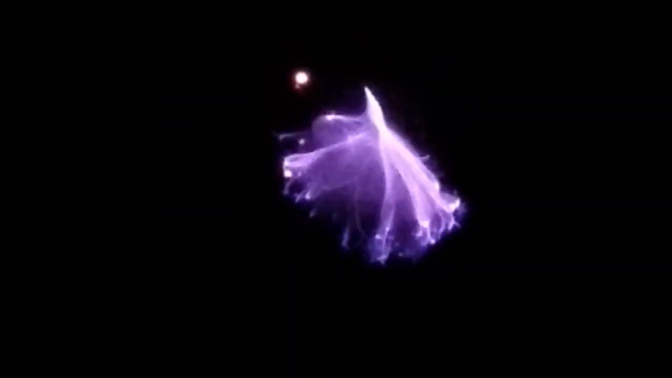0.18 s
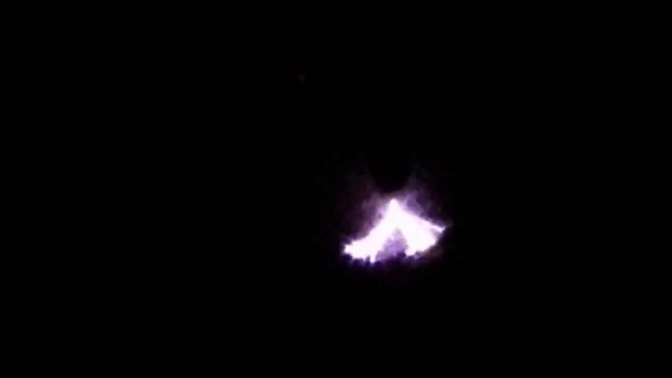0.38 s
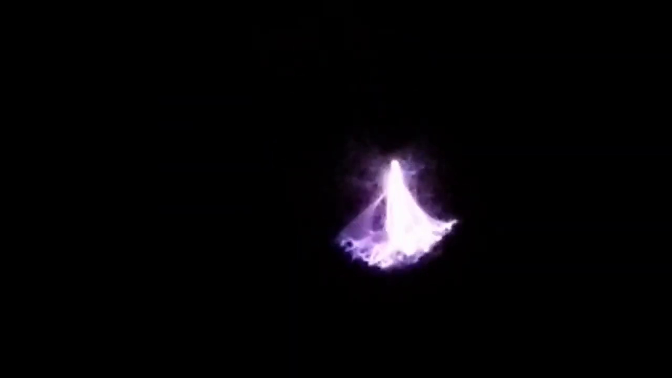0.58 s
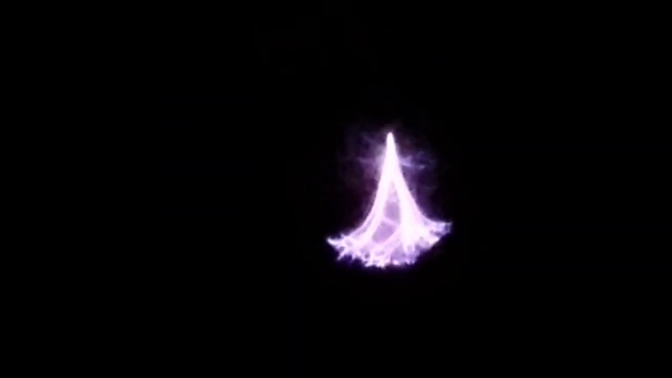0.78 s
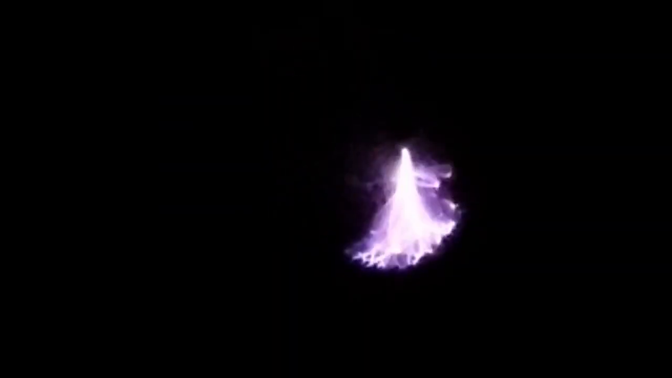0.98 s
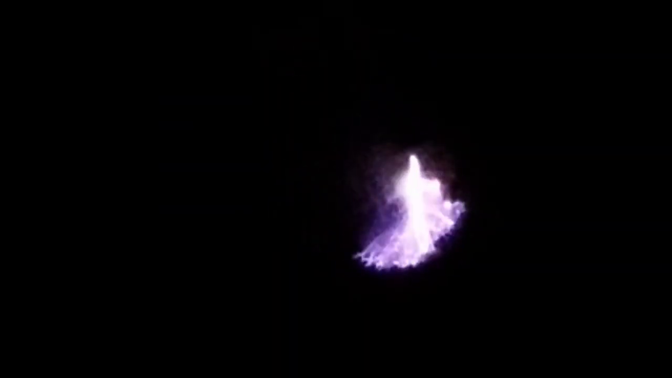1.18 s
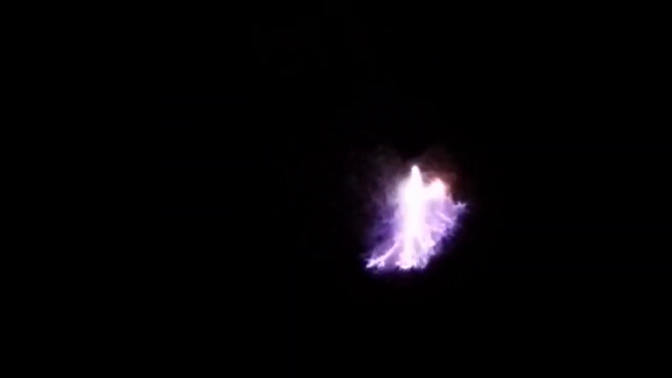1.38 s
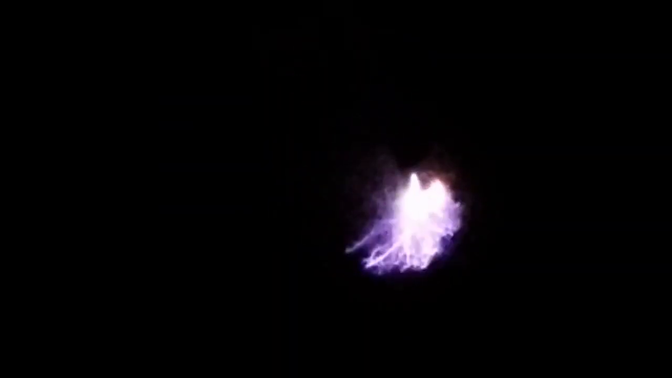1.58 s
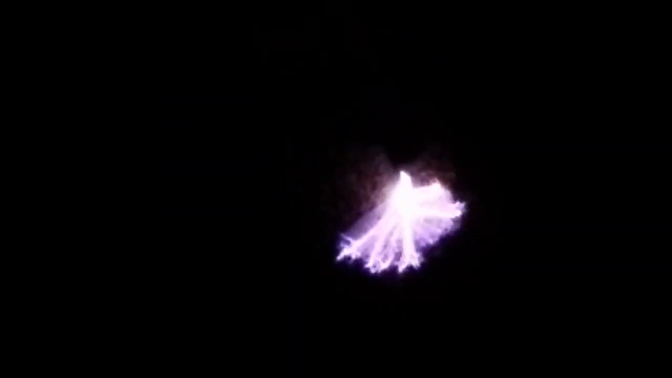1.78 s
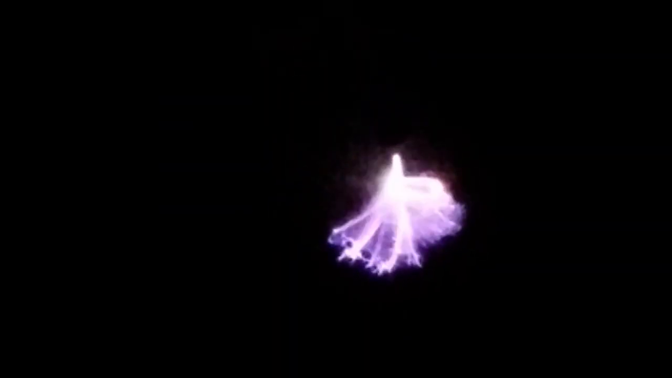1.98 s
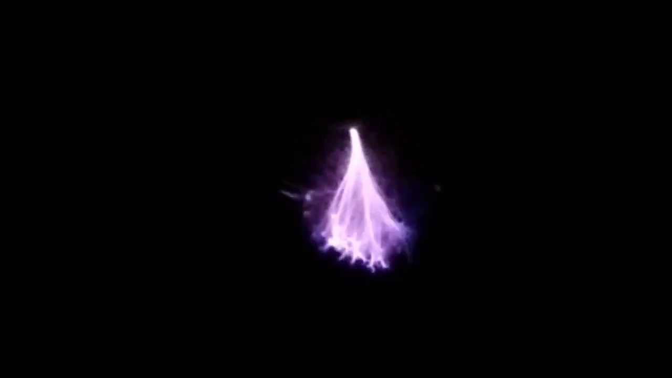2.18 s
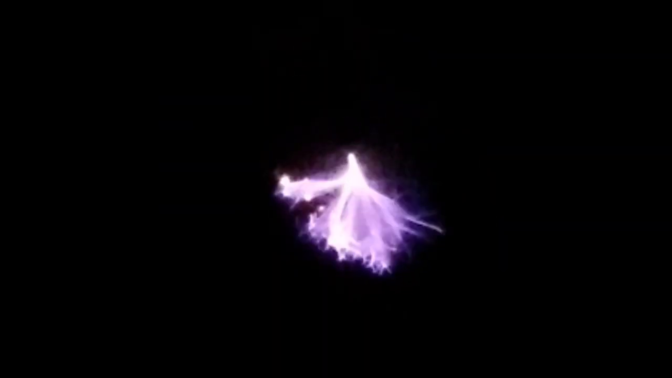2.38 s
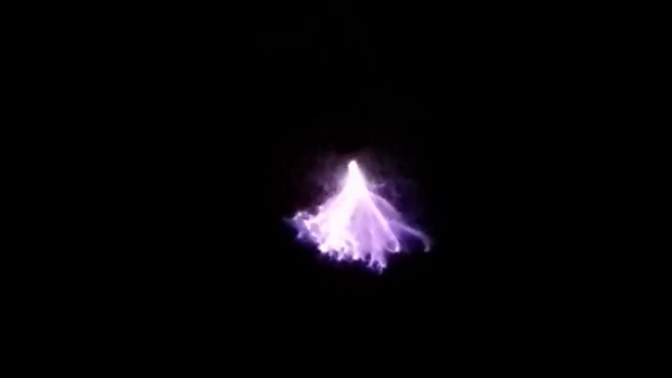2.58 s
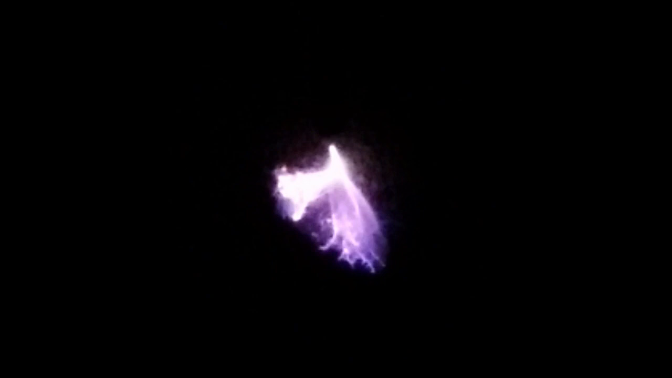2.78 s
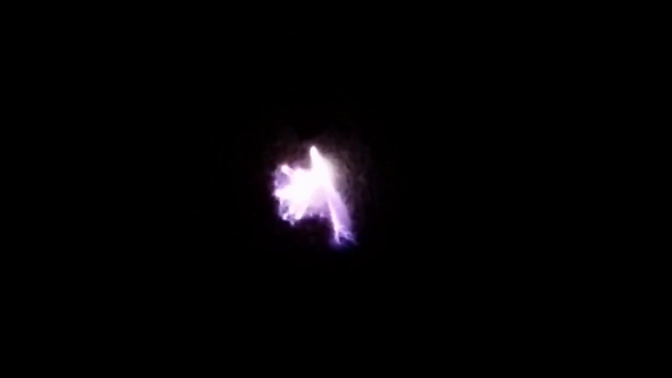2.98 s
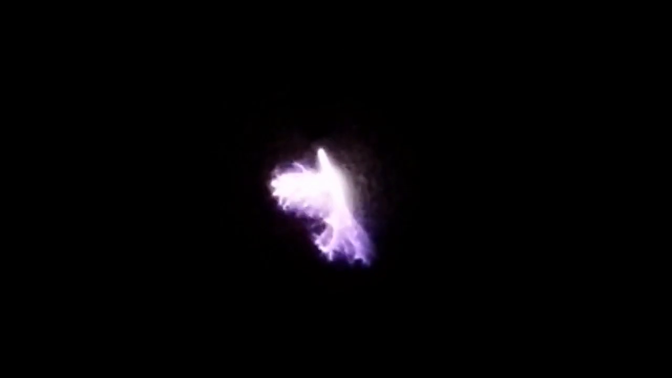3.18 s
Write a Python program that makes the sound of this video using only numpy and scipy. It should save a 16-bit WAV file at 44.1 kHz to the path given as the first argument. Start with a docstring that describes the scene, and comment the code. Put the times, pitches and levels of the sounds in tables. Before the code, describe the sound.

High-voltage electric arc buzzes harshly at mains rate, sizzling and crackling over a low hum.

```python
"""A faint buzz over a low rumble comes first, then swells: a mains-fed high-voltage arc over powder on a bench.
It strikes on every half cycle with a sharp snap, an impulse through a resonant colour; streamers fan out
as a short sizzling burst of gated noise, with tables for its delay and level (a long gap: later, louder).
Stray sparks crackle as random impulses, a few loud pops stand out, and a transformer hums as a wavering sine.
Two close microphone ports, near surfaces, a bench echo and a small room colour the arc."""
import sys
import numpy as np
from scipy import signal
from scipy.fft import rfft, irfft, next_fast_len
from scipy.io import wavfile
from scipy.ndimage import uniform_filter1d, map_coordinates

SR = 44100
rng = np.random.default_rng(int(sys.argv[2]) if len(sys.argv) > 2 else 0)


def store_pcm(level_fs):
    """Save levels as 16-bit WAV."""
    pcm = np.round(np.clip(level_fs, -1, 1) * 32767).astype(np.int16)
    wavfile.write(sys.argv[1], SR, np.atleast_2d(pcm).T)


def volts_from_decibels(level):
    """Turn decibel levels (scalar or array-like) into linear amplitude factors."""
    exponent = np.asarray(level, float) / 20
    return 10 ** exponent


N = 145530  # samples, 3.3 s
HALF_CYCLE_HZ = 120


def unit(x):
    """Normalisation: scale a signal to rms 1."""
    return x / np.sqrt(np.mean(x ** 2) + 1e-20)


def along(points, hz, col=1):
    """Spectral envelope: a table column interpolated on a log-frequency axis."""
    p = np.array(sorted(points))
    return np.interp(np.log(hz + 1), np.log(p[:, 0] + 1), p[:, col])


def at(rows, place):
    """Piecewise-linear envelope: every column after the first, read at the given places."""
    knots, *cols = np.transpose(rows)
    return [np.interp(place, knots, c) for c in cols]


def wobble(rate):
    """Band-limited random modulation: a smooth curve through random knots, rate of them a second."""
    return map_coordinates(rng.standard_normal(int(N * rate / SR) + 4), [np.arange(N) * rate / SR])


def filtered(x, response):
    """Linear filtering: convolution as a product with a complex frequency response."""
    size = next_fast_len(N + SR // 2)
    hz = np.fft.rfftfreq(size, 1 / SR)
    return irfft(rfft(x, size) * response(hz), size)[..., :N]


def causal(db):
    """Minimum phase: folding the cepstrum gives the causal response of a gain in dB on an FFT grid."""
    cepstrum = irfft(np.log(volts_from_decibels(db)))
    half = len(cepstrum) // 2
    cepstrum[1:half] *= 2
    cepstrum[half + 1:] = 0
    return np.exp(rfft(cepstrum))


def pulses(times, size):
    """Band-limited impulses: windowed sinc pulses at fractional sample times [s]."""
    place = np.asarray(times)[:, None] * SR
    i = place.astype(int) + np.arange(-7, 9)
    weight = np.sinc(i - place) * np.cos(np.pi * (i - place) / 16) ** 2 * size[:, None]
    return np.bincount(np.clip(i, 0, N).ravel(), weight.ravel(), N + 1)[:N]


def heard(x, colour_db):
    """Two-receiver transfer: source colour, port resonances, reflections and an interchannel phase lead."""
    # bench and housing colour at each port: (frequency [Hz], left [dB], right [dB])
    port_colour = [(292, -23.5, -21.5), (606, -20.5, -19), (980, -19.5, -12.5), (1337, -14, -18.5),
                   (1620, -15, -19), (2200, -25.5, -33), (2297, -14, -19), (2690, -16, -12.5),
                   (2995, -15, -18), (3444, -7.5, -26), (3610, -17.5, -15), (4103, -5, -7.5),
                   (4203, 0, -2.5), (4680, -4.5, -19.5), (4900, 4.4, -7), (4963, -4.5, -5),
                   (5320, -6.5, -25), (5560, -11.5, -3.5), (6620, -11, -18.5), (7030, -9, -8.5),
                   (8060, -19, -15.5), (8100, -26.5, -13), (9160, -10, -18.5), (9600, -15, -31.5),
                   (10530, -22, -12), (11200, -16.5, -20.5), (11600, -16, -21.5), (12200, -21.5, -25.5),
                   (13500, -20.5, -24), (15500, -26, -23)]
    # reflections from near surfaces: (delay [ms], left [dB], right [dB])
    near_surfaces = [(1.4, -18, -16), (3.6, -20, -18), (4.6, -16, -16)]
    # phase of the left port ahead of the right: (frequency [Hz], lead [rad])
    port_lead = [(0, 0), (690, 0.6), (1720, 2.0), (2410, 1.0), (2840, 2.8), (3270, 2.8), (3530, 0.5),
                 (4310, 3.0), (5340, 1.9), (5680, 2.8), (5940, 1.2), (6290, 4.6), (6720, 6.5), (7060, 3.7),
                 (7410, 5.4), (7750, 1.9), (8180, 7.4), (8440, 3.8), (8870, 4.7), (9130, 6.3), (9470, 6.2),
                 (9990, 9.1), (10800, 11.6), (11600, 12.0), (13100, 11.6), (15800, 15.8)]
    alike_below_hz = 560

    def way(hz):
        apart = 1 / (1 + (alike_below_hz / (hz + 1)) ** 4)  # the ports agree in the bass
        left = along(port_colour, hz, col=1)
        right = along(port_colour, hz, col=2)
        shared = causal((left + right) / 2 + colour_db(hz))
        lead = at(port_lead, hz)[0]
        out = []
        for col, side in ((1, .5), (2, -.5)):
            reflections = sum(volts_from_decibels(w[col]) * np.exp(-2j * np.pi * hz * w[0] / 1000) for w in near_surfaces)
            own = volts_from_decibels(side * apart * (left - right)) * np.exp(1j * side * lead)
            out.append(shared * (1 + apart * reflections) * own)
        return np.array(out)
    return filtered(x, way)


def streamers(t, cycle):
    """Gated noise: per half cycle a clean leader click and a burst of grit sharing its set energy."""
    # burst within the half cycle: (time [s], delay [ms], length [ms], clean click's energy share [0-1])
    burst_timing = [(0, 3.75, .5, .7), (.27, 3.75, .5, .7), (.31, 4.1, 1.5, .1), (.43, 4.1, 1.5, .1),
                    (.46, 3.15, .5, .7), (.66, 3.15, .6, .5), (.9, 3.2, 1.1, .2), (.95, 4.1, 1.3, .1),
                    (1.1, 4.1, 1.3, .1), (1.13, 3.1, .6, .6), (1.5, 3.1, .5, .9), (2.2, 3.1, .5, .9),
                    (2.28, 3.1, 1.1, .3), (2.32, 4.1, 1.6, .1), (2.51, 4.1, 1.6, .1), (2.56, 3.15, .6, .5),
                    (3.3, 3.15, .5, .7)]
    # single bursts that stand out: (time [s], boost [dB])
    strong_bursts = [(.187, 5), (.312, 1), (.719, 8), (1.136, 8), (1.452, 3), (2.278, 2), (1.33, 3),
                     (2.52, 5)]
    scatter_db, jitter_ms, leader_jitter_ms = 1.1, .12, .02
    odd_half_db = .7  # one polarity burns stronger
    corona_db, treble_corona_db = -12, 0  # steady hiss under the bursts, before band levels
    treble_spread, treble_leader = .7, .1

    count = np.arange(cycle[-1] + 1)
    start = count / HALF_CYCLE_HZ
    r = rng.standard_normal((len(start), 3))
    delay_ms, length_ms, clean = at(burst_timing, start)
    strong_db = sum(db * (count == int(s * HALF_CYCLE_HZ)) for s, db in strong_bursts)
    size = volts_from_decibels(scatter_db * r[:, 1] + strong_db + odd_half_db * (-1.) ** count)

    since_ms = (t - start[cycle]) * 1000 - (delay_ms + jitter_ms * r[:, 0])[cycle]
    progress = np.clip(since_ms / length_ms[cycle], 0, 1)
    grit = np.sqrt(np.abs(np.sin(np.pi * progress))) * rng.standard_normal((3, N))
    energy = np.bincount(cycle, grit[0] ** 2) + 1e-9
    grit = grit / np.sqrt(energy)[cycle] * (size * np.sqrt(1 - clean))[cycle]
    leader_time = start + (delay_ms + .1 + leader_jitter_ms * r[:, 2]) / 1000
    leader = pulses(leader_time, -size * np.sqrt(clean))

    source = unit(leader + grit[0]) + volts_from_decibels(corona_db) * rng.standard_normal((2, N))
    wide = unit(treble_leader * leader + grit[0]) + treble_spread * unit(grit[1:])
    wide = wide + volts_from_decibels(treble_corona_db) * rng.standard_normal((2, N))
    return source, wide, size


def sizzle():
    """Subband synthesis: four bands of the streamer bursts follow their own level envelopes."""
    # burst levels before the common gain:
    # (time [s], level [dB], treble re level [dB], low mids re level [dB], mids re level [dB])
    band_levels = [(0, -39, -7, -6.5, -2), (.08, -47, 2, -14, 1), (.1, -54, -5, -4, 1),
                   (.17, -48, -7, -7, -2), (.19, -47, -3, -11, -4), (.22, -47.5, -11, -8, 3),
                   (.23, -40, -0.5, -11, 3), (.265, -34, -4, -17, -9), (.279, -34.5, 0, 0, 1.5),
                   (.305, -51, 15.5, -7, 3), (.312, -24.5, -4, -18, -7), (.435, -30, 0, -7.5, -5),
                   (.445, -38.5, -2, -5.5, -11), (.56, -37, 2, -6, -15), (.66, -32, -4, -11.5, -14),
                   (.67, -29.5, -0.5, -16, -7), (.73, -30, -7.5, -20, -14), (.75, -32, -1.5, -16, -11),
                   (.8, -32.5, 0, -13, -6.5), (.89, -29.5, -0.5, -27, -2), (.91, -26.5, -0.5, -11, -5.5),
                   (1.0, -27.5, -1, -12, -10), (1.1, -31, 2.5, -5, -3), (1.11, -36.5, 0.5, -16, 7),
                   (1.14, -31.5, -6.5, -30, -11), (1.15, -44.5, 10, -30, 10),
                   (1.21, -35.5, -2.5, -11, -4.5), (1.26, -34, -1.5, -13, 0.5), (1.345, -27, -12, -15, -17),
                   (1.36, -33.5, -5.5, -8, -14), (1.43, -35.5, -4, -14, -12), (1.455, -29, -12, -15.5, -34),
                   (1.48, -34, -5, -10, -6), (1.51, -35.5, -5.5, -12, -12), (1.55, -33, -6.5, -8, -12.5),
                   (1.81, -33.5, -4, -8.5, -12), (2.0, -32.5, -4, -10.5, -11), (2.2, -32.5, -5, -9.5, -7.5),
                   (2.22, -35, 2.5, -10, 0.5), (2.25, -28.5, -3, -30, -1), (2.27, -28.5, -4.5, -14, -8),
                   (2.29, -35, 0, -13, -1), (2.31, -27.5, -1, -12.5, -12), (2.4, -26, -2, -15, -12),
                   (2.505, -30, 0, -9, -4.5), (2.53, -29, -11.5, -20, -16), (2.56, -32, -4.5, -21, -11),
                   (2.65, -28.5, -6, -23, -19), (2.74, -29.5, -5.5, -23, -24),
                   (2.77, -36, -1.5, -14.5, -12), (2.99, -36, -4.5, -12, -14.5),
                   (3.03, -42.5, -4.5, -9, -6), (3.3, -42, -4.5, -9, -15)]
    gain_db = 2
    evenness = .75  # how nearly each half cycle spends its set energy, 0-1
    t = np.arange(N) / SR
    source, wide, size = streamers(t, (t * HALF_CYCLE_HZ).astype(int))
    level_db, treble_db, low_db, mid_db = at(band_levels, t)
    # half cycles counted from just before the burst
    turn = np.clip(((t - .0025) * HALF_CYCLE_HZ).astype(int), 0, None)

    def edge(hz, edge_hz):
        return 1 / (1 + (hz / edge_hz) ** 12)

    def band(x, low_hz, top_hz):
        passed = filtered(x, lambda hz: edge(hz, top_hz) * edge(low_hz, hz + 1))
        return heard(passed, np.zeros_like)

    def even(y):
        energy = np.bincount(turn, (y ** 2).sum(0))
        correction = (size[:turn[-1] + 1] ** 2 / energy) ** (evenness / 2)
        return unit(y * correction[turn])

    bands = [(source, 0, 4200, 6400), (wide, treble_db, 6400, 16000),
             (source, low_db, 1700, 3000), (source, mid_db, 3000, 4200)]
    return sum(even(band(x, low_hz, top_hz)) * volts_from_decibels(level_db + db + gain_db)
               for x, db, low_hz, top_hz in bands)


def gliding(x):
    """Time-varying formant: a Gaussian band of gain glides in frequency as the arc stretches."""
    # moving band of the sizzle: (time [s], centre [Hz], lift [dB])
    glide_path = [(0, 4440, -1), (.22, 4200, -1), (.3, 4650, -5.5), (.45, 5370, 3.5), (.65, 4900, -0.5),
                  (.68, 4200, 3), (.8, 4400, 10), (.95, 5070, 0.5), (1.1, 4500, 8), (1.15, 4830, 3.5),
                  (1.2, 3900, 5.5), (1.27, 4700, 3), (1.35, 4970, 2.5), (1.5, 4900, -1.7),
                  (2.19, 3300, -0.2), (2.22, 3600, 6), (2.28, 4240, 11), (2.33, 5200, 2.5), (2.5, 4900, 4),
                  (2.8, 5100, .1), (3.3, 4800, 2)]
    width_hz = 380
    hz, t, z = signal.stft(x, SR, nperseg=256)
    centre_hz, lift_db = at(glide_path, t)
    bump = np.exp(-.5 * ((hz[:, None] - centre_hz) / width_hz) ** 2)
    return signal.istft(z * volts_from_decibels(lift_db * bump), SR, nperseg=256)[1][:, :N]


def strikes():
    """Impulse excitation: one coloured snap per half cycle, and stray sparks as a random pulse train."""
    # main strike, before the strike gain: (time [s], snap level [dB], stray crackle re snap [dB])
    strike_levels = [(0, -49.5, 2.5), (.11, -54, -9), (.22, -47, -3), (.26, -46.5, 2.5), (.33, -43.5, 1.5),
                     (.44, -51.5, 9.5), (.48, -42.5, -9.5), (.58, -45, -0.5), (.62, -41.5, -1),
                     (.655, -43, 1), (.68, -47.5, 2.5), (.93, -46.5, 0), (1.1, -48, 3), (1.2, -41.5, 2),
                     (1.36, -43.5, -0.5), (1.62, -41.5, -3), (1.9, -42, -0.5), (2.27, -40.5, 2.5),
                     (2.31, -50.5, 5.5), (2.5, -50, 4.5), (2.56, -43, 3.5), (2.78, -44.5, 2.5),
                     (2.86, -46.5, -9.5), (2.91, -45, 3.5), (3.05, -44.5, -6), (3.3, -46, 1)]
    # firing point within the half cycle: (time [s], delay [ms])
    firing_delay = [(0, 3.85), (.27, 3.85), (.3, 3.25), (.93, 3.2), (.96, 3.6), (1.09, 3.6), (1.12, 3.2),
                    (2.29, 3.2), (2.32, 3.6), (2.5, 3.6), (2.54, 3.2), (3.3, 3.2)]
    # colour of the snap: (frequency [Hz], gain [dB])
    snap_colour = [(100, -20.5), (240, -1), (360, -8.5), (480, 6), (600, 8.5), (720, 5), (840, 2.5),
                   (960, 11), (1080, 2), (1200, 1.5), (1440, 5.5), (1800, -16), (2500, -2), (4000, -22.5),
                   (16000, -10)]
    # colour of the stray sparks: (frequency [Hz], gain [dB])
    stray_colour = [(100, -9), (300, -7), (700, 2), (1200, 5), (2500, 4.5), (5000, -13.5), (16000, -56)]
    gain_db, stray_per_s = 1, 2200
    scatter_db, jitter_ms, drift_ms = .9, .015, .02

    start = np.arange(int(N / SR * HALF_CYCLE_HZ)) / HALF_CYCLE_HZ
    r = rng.standard_normal((len(start), 2))
    drift = wobble(12)[(start * SR).astype(int)]
    delay_ms = at(firing_delay, start)[0] + jitter_ms * r[:, 0] + drift_ms * drift
    level_db, stray_db = at(strike_levels, np.arange(N) / SR)
    train = pulses(start + delay_ms / 1000, -volts_from_decibels(scatter_db * r[:, 1]))

    def snap_db(hz):
        return along(snap_colour, hz)

    scale = np.std(heard(train, snap_db))  # the unweighted snaps set the reference level
    snaps = heard(train * volts_from_decibels(level_db + gain_db), snap_db) / scale
    u = rng.random((2, N))
    sparks = (u[0] < stray_per_s / SR) * np.sqrt(-np.log(u[1] + 1e-9))  # Rayleigh-distributed sizes
    strays = unit(sparks) * np.std(train) * volts_from_decibels(level_db + gain_db + stray_db)
    crackle = heard(strays, lambda hz: along(stray_colour, hz)) / scale
    return snaps + crackle


def pops():
    """Impulse response: single loud discharges ring through a broad colour and both ports."""
    # single pops, before the pop gain: (time [s], level [dB])
    pop_times = [(.2700, -26), (.2748, -11), (.2853, -24), (.2898, -17), (.3001, -17), (.3077, -18),
                 (.3185, -25)]
    # colour of a pop: (frequency [Hz], gain [dB])
    pop_colour = [(100, -3), (400, -1), (1200, 0), (2500, -4), (5000, -8), (16000, -22)]
    gain_db = 36
    when, level_db = np.transpose(pop_times)
    return heard(pulses(when, volts_from_decibels(level_db + gain_db)), lambda hz: along(pop_colour, hz))


def wavering(x):
    """Spectral modulation: the buzz harmonics swell and fade, each in its own time."""
    waver_db = 2.5
    z = signal.stft(x, nperseg=1024)[2]
    field = uniform_filter1d(rng.standard_normal(z.shape[1:]), size=5, axis=0)  # over frequency
    field = uniform_filter1d(field, size=10, axis=1)  # over time
    return signal.istft(z * volts_from_decibels(waver_db * unit(field)), nperseg=1024)[1][:, :N]


def bench(x):
    """Comb filtering: a bench echo whose delay drifts as the arc wanders."""
    delay_ms, drift_ms, echo_db = 2.6, .2, -13
    late = np.arange(N) - (delay_ms + drift_ms * wobble(6)) * SR / 1000
    return x + volts_from_decibels(echo_db) * np.array([map_coordinates(c, [late]) for c in x])


def room(x):
    """Diffuse reverberation: decaying noise tails, one per channel, renewed as the arc moves."""
    # reverberation time: (frequency [Hz], T60 [s])
    decay_times = [(300, 0.6), (3000, 0.3), (9000, .12), (14000, 0.12)]
    # colour of the diffuse tail: (frequency [Hz], gain [dB])
    tail_colour = [(250, -20), (600, -7), (1200, -3), (2500, 0), (8000, 0), (13000, 5)]
    renewal_s = .25
    out, place = 0, np.arange(N) / SR / renewal_s
    for k in range(int(place[-1]) + 2):
        hz, t, z = signal.stft(rng.standard_normal((2, SR // 3)), SR, nperseg=256)
        decay_db = along(tail_colour, hz)[:, None] - 60 * t / along(decay_times, hz)[:, None]
        tail = signal.istft(z * volts_from_decibels(decay_db), SR, nperseg=256)[1]
        piece = x * np.cos(np.pi / 2 * np.clip(place - k, -1, 1))  # equal-power crossfade
        late = np.pad(piece, ((0, 0), (200, 0)))  # the tail starts 200 samples late
        out = out + signal.fftconvolve(late, tail / np.linalg.norm(tail[0]), axes=1)[:, :N]
    return out


def hum():
    """Amplitude and phase modulation: a wavering transformer sine over a lumpy low rumble of noise."""
    # hum level before the tone gain: (time [s], level [dB])
    hum_levels = [(0.0, -73), (0.36, -44), (0.39, -53), (0.61, -58), (0.65, -48), (0.71, -59),
                  (0.89, -45.5), (1.0, -65), (1.13, -45.5), (1.17, -59), (1.24, -42.5), (1.55, -51.5),
                  (1.58, -40), (1.66, -56), (1.74, -42.5), (2.07, -55.5), (2.21, -40.5), (2.32, -61.5),
                  (2.77, -50), (2.8, -61), (3.0, -48), (3.07, -60.5), (3.26, -50.5), (3.3, -71)]
    # colour of the rumble: (frequency [Hz], gain [dB])
    rumble_colour = [(15, -30), (25, -21), (45, -1.5), (64, 1), (100, -1), (130, -2), (170, -1.5),
                     (260, -3.5), (420, -4), (550, -2), (920, -73)]
    tone_db, waver_db, wander_rad = -4, 3, .8
    rumble_db, side_db, lump_db = -56.5, -16, 3.8
    follows = .6  # dB of rumble per dB of hum
    t = np.arange(N) / SR
    hum_db = at(hum_levels, t)[0]
    lumps = wobble(33.78)  # both swell and flutter together
    phase = 2 * np.pi * HALF_CYCLE_HZ * t + wander_rad * wobble(13)
    tone = np.sqrt(2) * volts_from_decibels(hum_db + tone_db + waver_db * lumps) * np.sin(phase)
    swell_db = lump_db * lumps + follows * (hum_db - hum_db.mean())
    noise = rng.standard_normal((2, N)) * volts_from_decibels(swell_db)
    mid, side = unit(filtered(noise, lambda hz: volts_from_decibels(along(rumble_colour, hz)))) * volts_from_decibels(rumble_db)
    side = side * volts_from_decibels(side_db)
    return tone + np.array([mid + side, mid - side])


def scene():
    """Superposition: the arc with its bench echo, the room's tail and the hum add linearly."""
    room_db = -10
    arc = bench(gliding(sizzle()) + wavering(strikes() + pops()))
    return arc + volts_from_decibels(room_db) * room(arc) + hum()


def roll_off(x):
    """The treble ends steeply here."""
    return signal.sosfilt(signal.butter(12, 16220, fs=SR, output="sos"), x)


def record(dry):
    """Saturation: a memoryless soft clipper bends the peaks."""
    ceiling = .8
    mix = dry / (1 + np.abs(dry / ceiling) ** 4) ** 0.28
    return roll_off(mix)


dry = scene()
out = record(dry)
store_pcm(out)
```